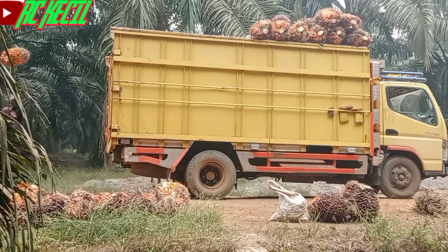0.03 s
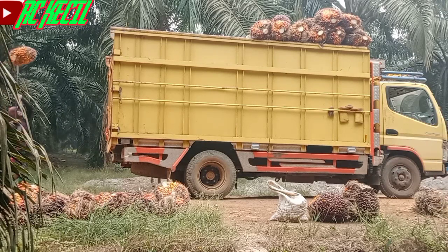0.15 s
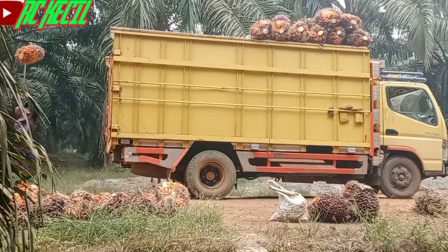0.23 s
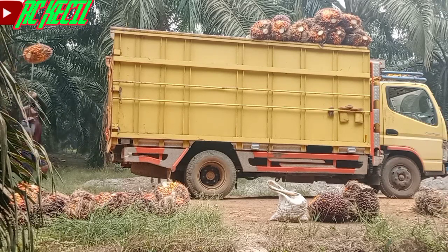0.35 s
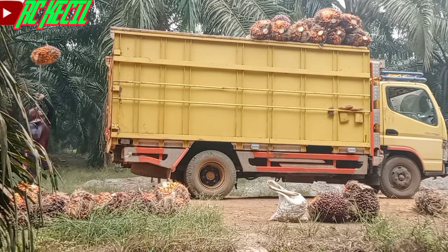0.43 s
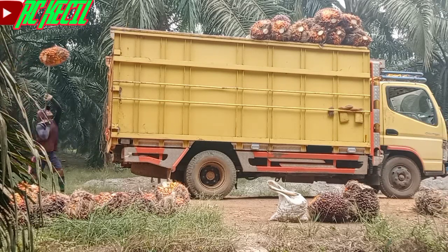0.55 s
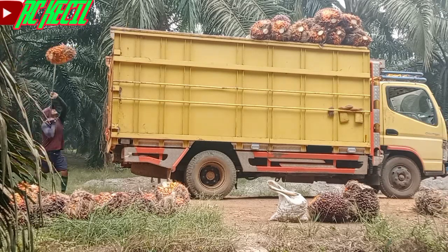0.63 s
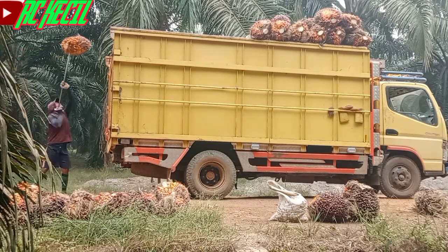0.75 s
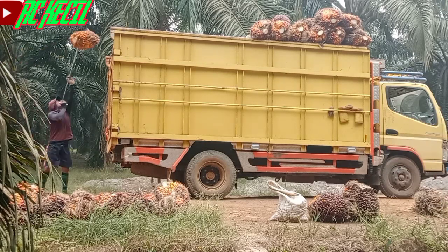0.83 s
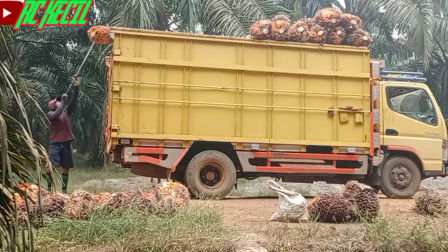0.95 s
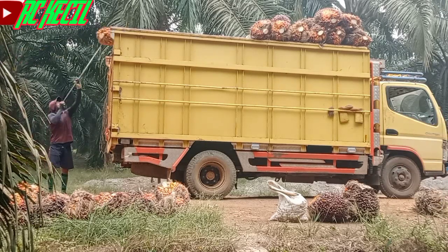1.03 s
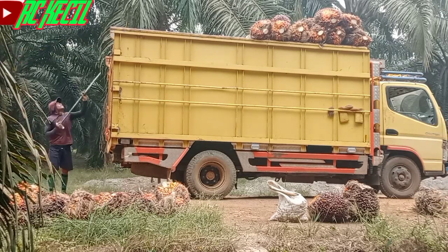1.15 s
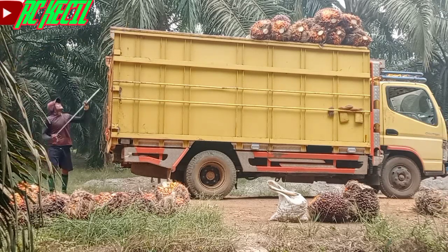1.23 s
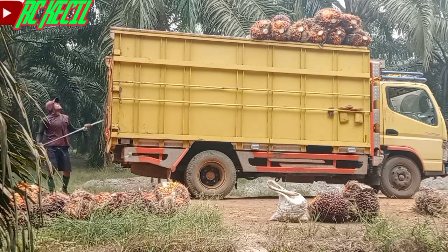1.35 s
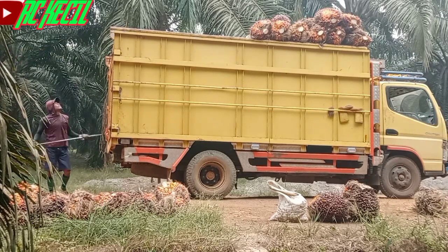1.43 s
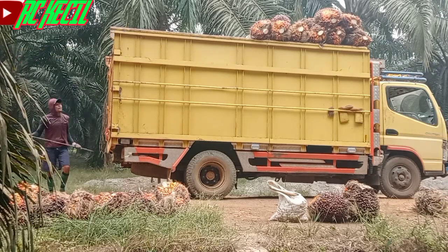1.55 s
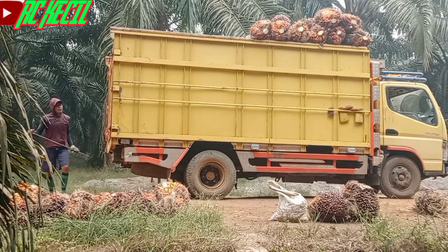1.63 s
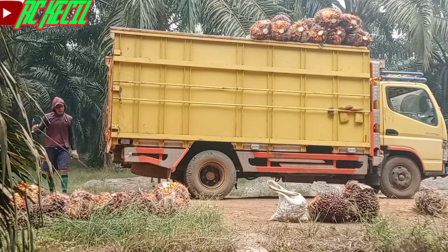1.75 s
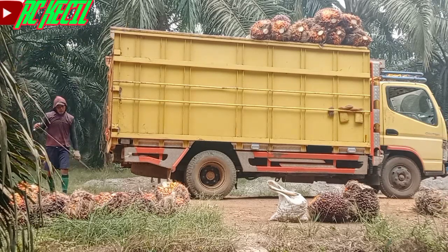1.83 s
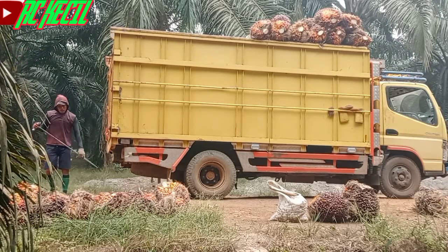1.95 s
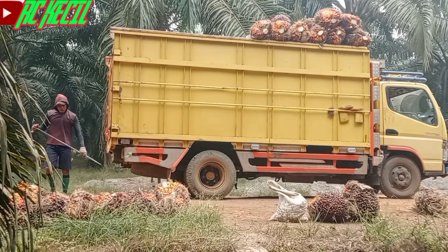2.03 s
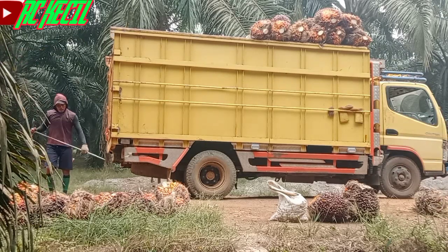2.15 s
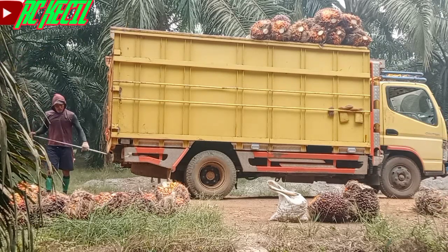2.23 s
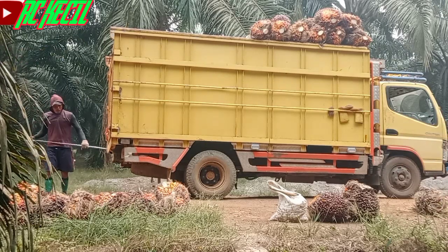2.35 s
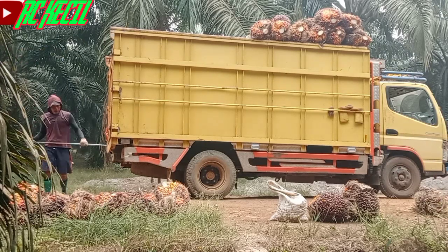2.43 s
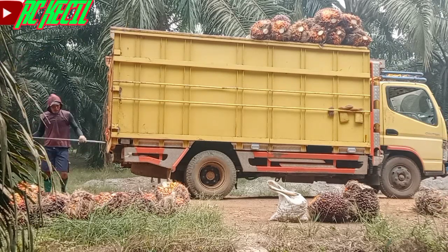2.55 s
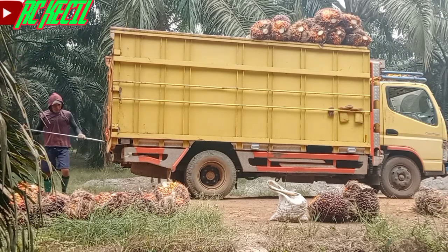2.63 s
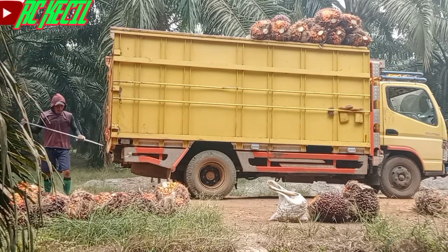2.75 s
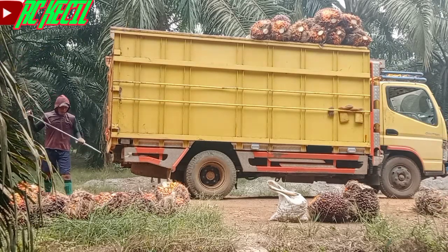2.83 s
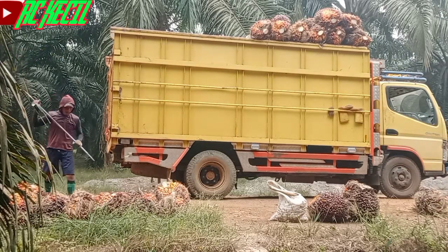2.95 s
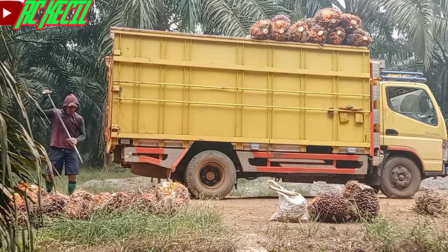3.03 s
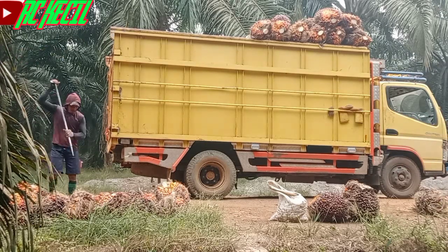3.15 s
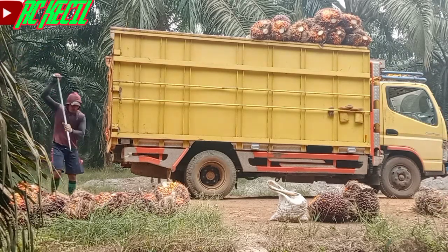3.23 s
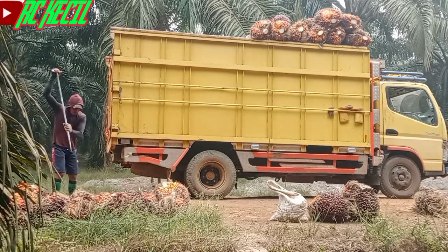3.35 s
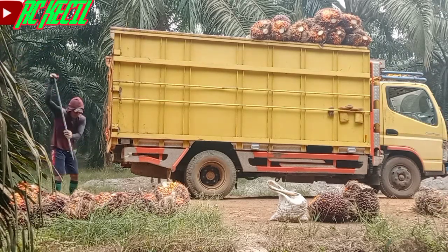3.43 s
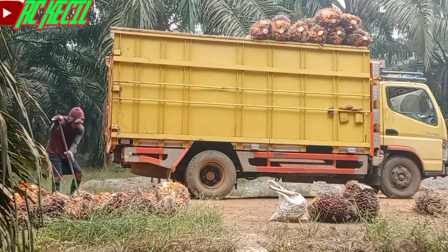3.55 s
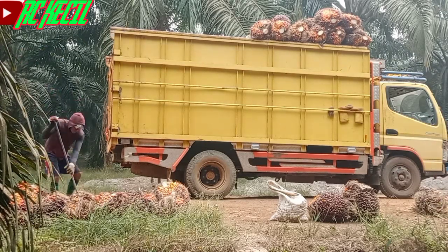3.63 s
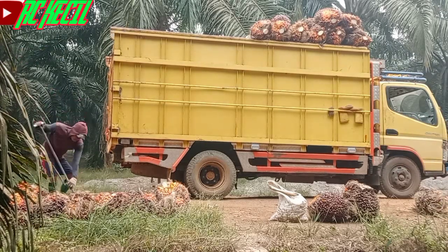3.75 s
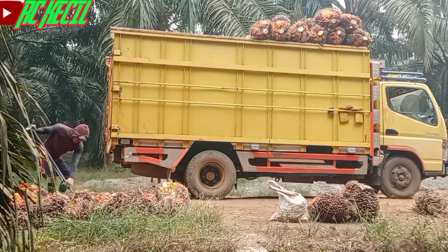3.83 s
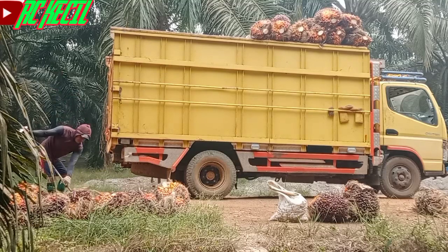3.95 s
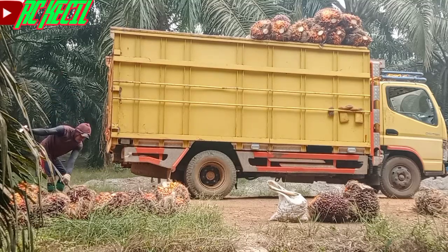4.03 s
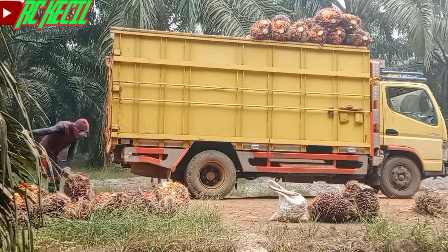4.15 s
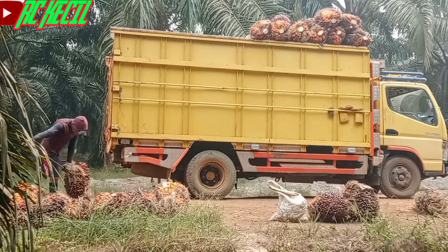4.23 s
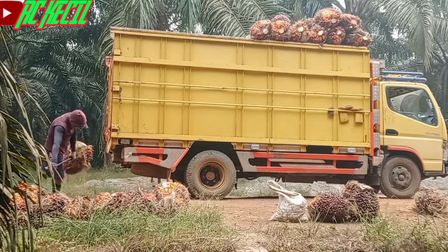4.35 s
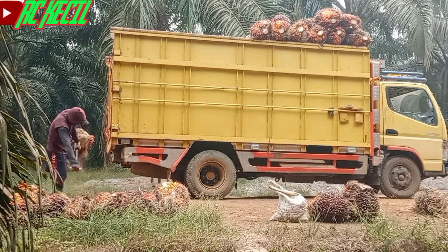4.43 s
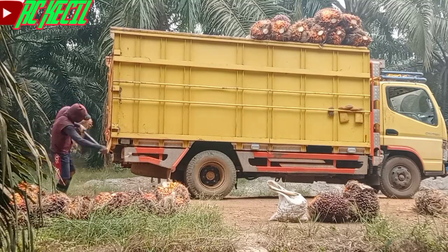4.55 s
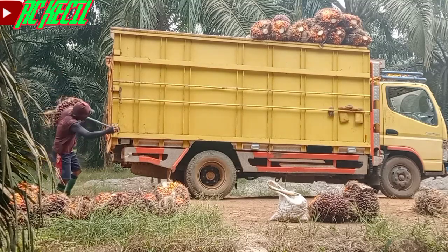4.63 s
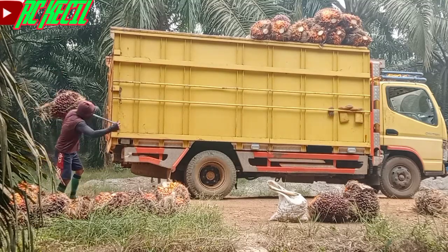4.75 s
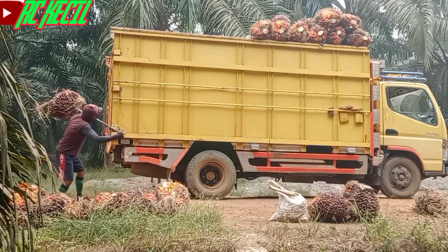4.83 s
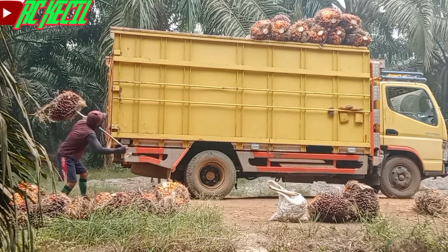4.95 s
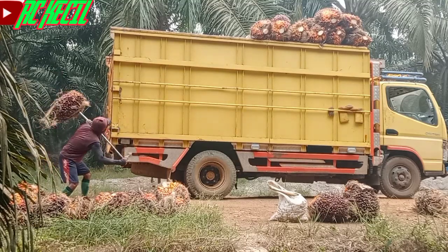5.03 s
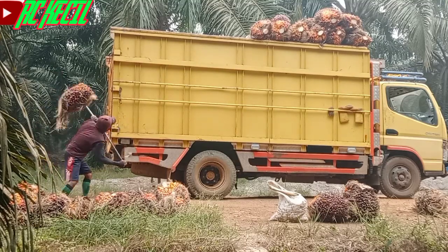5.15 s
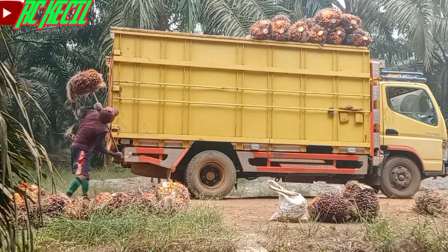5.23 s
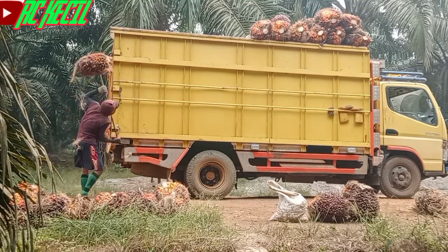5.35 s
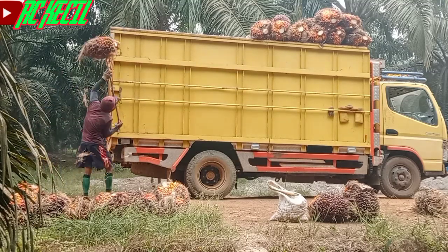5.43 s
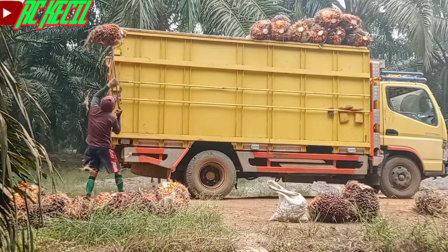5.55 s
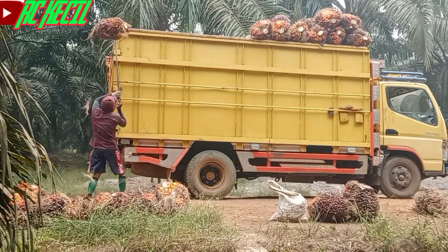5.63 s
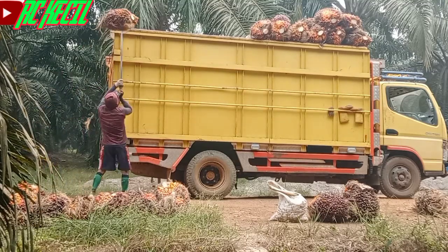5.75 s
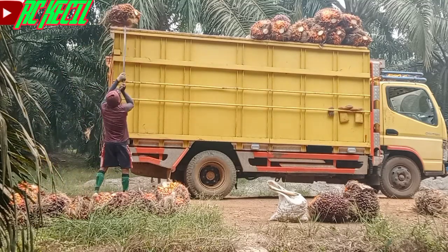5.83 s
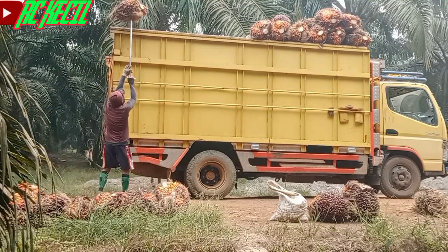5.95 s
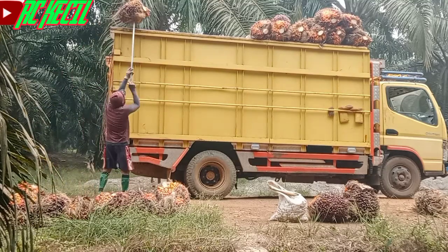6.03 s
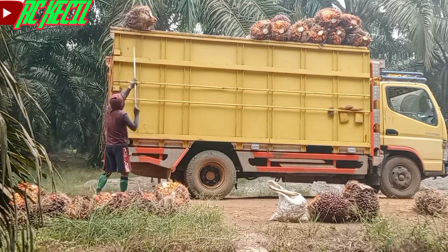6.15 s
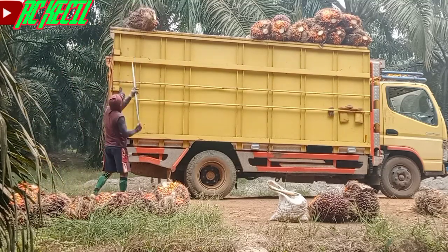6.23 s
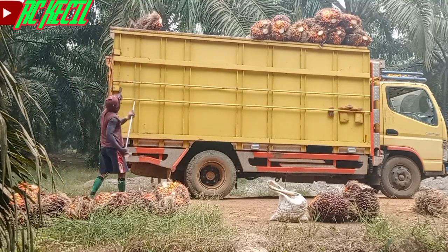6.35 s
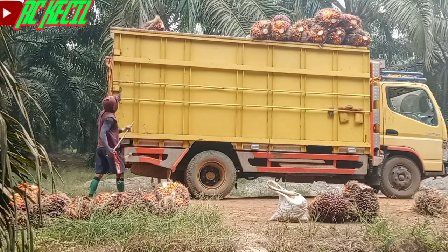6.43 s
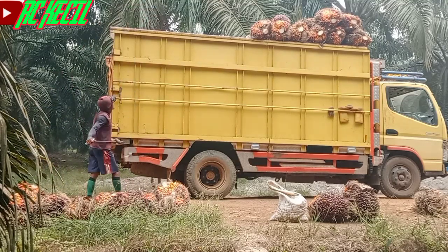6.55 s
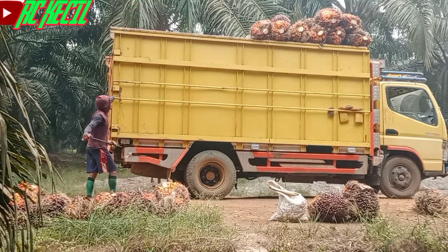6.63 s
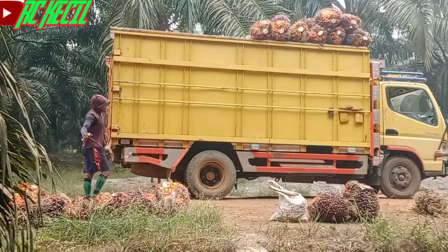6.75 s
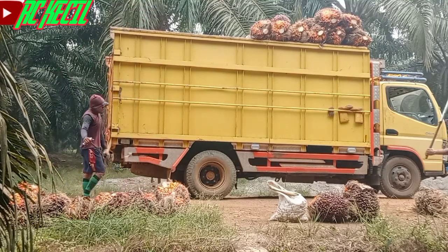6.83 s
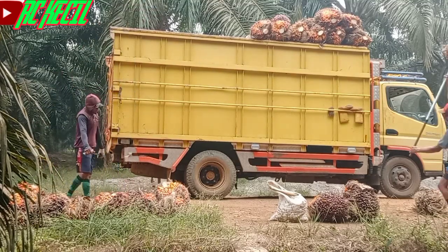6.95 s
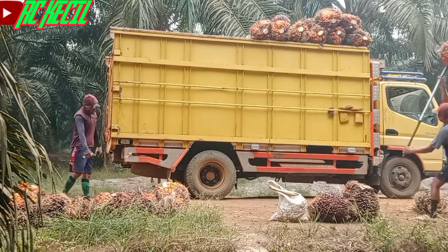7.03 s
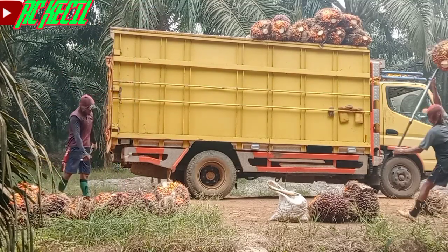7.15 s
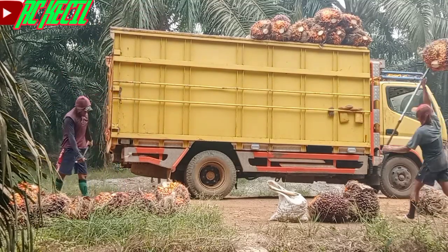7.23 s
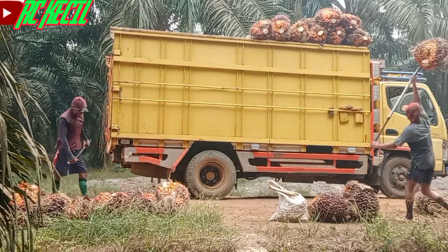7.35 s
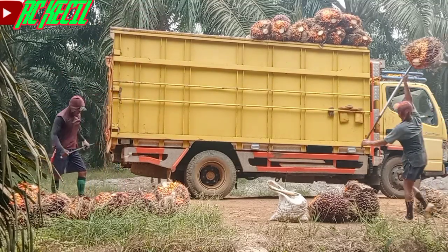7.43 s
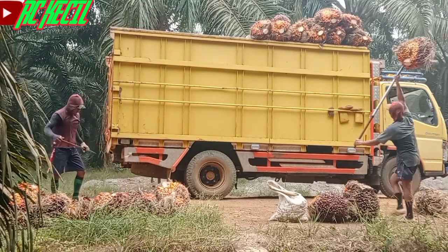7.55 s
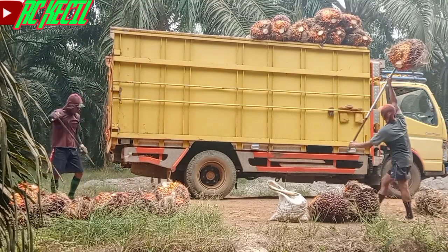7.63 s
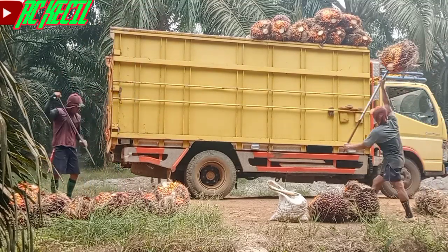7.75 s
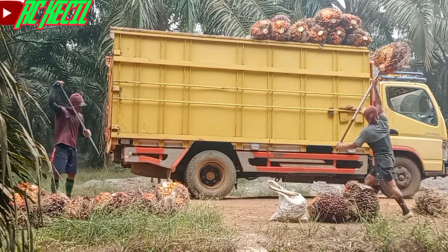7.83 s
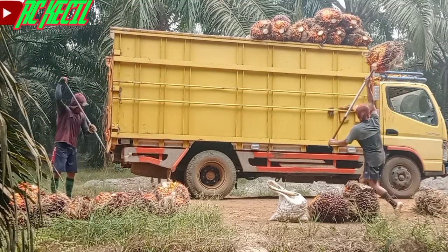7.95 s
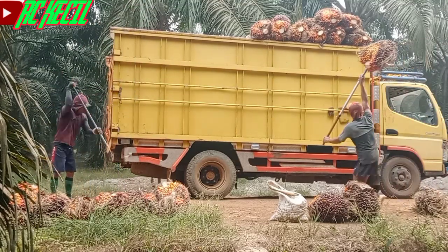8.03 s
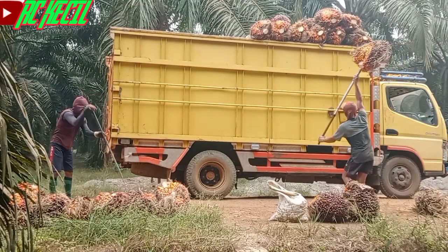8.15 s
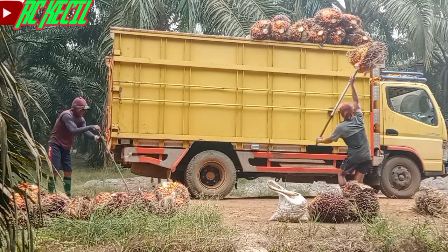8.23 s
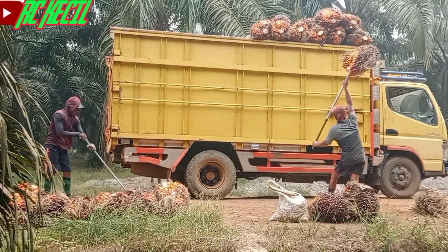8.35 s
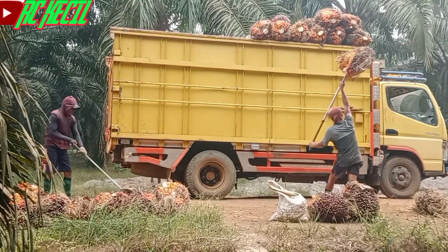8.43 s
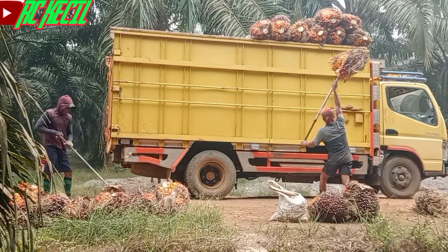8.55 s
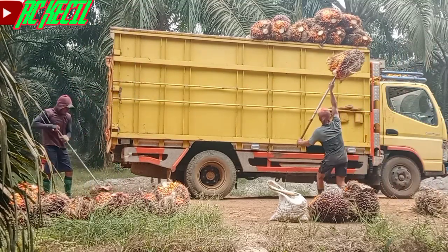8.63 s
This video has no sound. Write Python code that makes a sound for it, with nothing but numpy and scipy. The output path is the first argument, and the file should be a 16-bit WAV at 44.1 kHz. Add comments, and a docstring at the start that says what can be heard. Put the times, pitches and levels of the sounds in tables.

```python
"""Loading palm fruit bunches into a steel truck box

Heavy bunches thud and crunch as decaying tones, box modes and crackling grains; each blow sets the box booming.
A steel pole stabs (torn fibres), clacks (damped modes), scrapes and squeaks (stick-slip); hollow bumps sag in pitch.
Boots, fronds and dry stalks rustle and snap as coloured grains and noise, with dull knocks between.
Behind lie still air, a low rumble and thin insect bands; a close wall echo and a late tail add the place."""
import sys
import numpy as np
from scipy import signal
from scipy.fft import rfft, irfft, next_fast_len
from scipy.io import wavfile
from scipy.ndimage import uniform_filter1d, map_coordinates

SR = 44100
rng = np.random.default_rng(int(sys.argv[2]) if len(sys.argv) > 2 else 0)


def store_pcm(level_fs):
    """Save levels as 16-bit WAV."""
    pcm = np.round(np.clip(level_fs, -1, 1) * 32767).astype(np.int16)
    wavfile.write(sys.argv[1], SR, np.atleast_2d(pcm).T)


N = 383065
T = np.arange(N) / SR  # time axis of the scene, s
HIT = T[:3 * SR // 2]  # time axis of one contact, s

# spectrum of dry spines snapping: freq_hz, level_db
SPINES = [(2940, -42), (5000, -13.5), (5190, -14), (7200, 2.5), (7580, -1), (9560, -17), (12900, -21),
          (14900, -17), (15500, -18)]
# spectrum of scuffed litter and cracking stalks: freq_hz, level_db
SCUFF = [(180, -11), (300, -2.5), (459, -3.5), (775, -2), (1340, -3.5), (2550, -1.5), (3180, 1.5),
         (3860, -1.5), (4930, -15.5), (5500, -16.5), (7150, -48), (12100, -120)]
# spectrum of splintering twigs and stalks: freq_hz, level_db
SPLINTER = [(4000, -9.5), (5200, -10.5), (7300, 5.5), (9500, -10.5), (15000, -16)]


def amp(db):
    """Level law: decibels to amplitude gain."""
    return 10 ** (np.asarray(db) / 20)


def unit(x):
    """Normalisation: scale to rms 1."""
    return x / np.sqrt(np.mean(x ** 2) + 1e-20)


def along(points, hz):
    """Interpolation of (freq_hz, value) points on a logarithmic frequency axis."""
    f, v = np.transpose(points)
    return np.interp(np.log(hz + 1), np.log(np.abs(f) + 1), v)


def wobble(rate):
    """Slow random modulation: a smooth curve through rate random knots a second."""
    return map_coordinates(rng.standard_normal(1024), [T * rate], mode="wrap")


def filtered(x, response):
    """Linear filtering: the spectrum of x times a response of frequency."""
    m = next_fast_len(len(x) + 8192)
    spectrum = rfft(x, m) * response(np.fft.rfftfreq(m, 1 / SR))
    return irfft(spectrum, m)[:len(x)]


def colour(x, spectrum):
    """Spectral shaping: x weighted by a table of levels, at rms 1."""
    return unit(filtered(x, lambda hz: amp(along(spectrum, hz))))


def noise():
    """White noise as long as one contact."""
    return rng.standard_normal(len(HIT))


def grains(size, rate, spread_db):
    """Shot noise: tiny snaps of uneven strength at random moments, rate a second."""
    strength = amp(spread_db * np.clip(rng.standard_normal(size), -2, 2))
    return unit((rng.random(size) < rate / SR) * strength * rng.standard_normal(size))


def lumpy(x, depth_db):
    """Fracture has local pitch: random time-frequency patches stand out of the crackle."""
    z = signal.stft(x, nperseg=256)[2]
    field = uniform_filter1d(rng.standard_normal(z.shape), size=3, axis=0)
    field = uniform_filter1d(field, size=4, axis=1)
    return unit(signal.istft(z * amp(depth_db * unit(field)), nperseg=256)[1][:len(x)])


def swell(rise, t60):
    """Contact law: force builds up over the rise, then decays by 60 dB in t60."""
    build_up = np.sin(np.pi / 2 * np.minimum(HIT / rise, 1)) ** 2
    return build_up * amp(-60 * np.maximum(HIT - rise, 0) / t60)


def held(s, length, attack, t60):
    """Sustained excitation: a movement starts at s, holds until s + length, then decays."""
    build_up = np.sin(np.pi / 2 * np.clip((T - s) / attack, 0, 1)) ** 2
    return build_up * np.exp(-np.log(1000) * np.maximum(T - s - length, 0) / t60)


def dying(x, decays):
    """Frequency-dependent damping: each frequency of x decays with its own t60."""
    hz, t, z = signal.stft(x, SR, nperseg=256)
    loss = amp(-60 * t / along(decays, hz)[:, None])
    return signal.istft(z * loss, SR, nperseg=256)[1][:len(x)]


def ring(modes, rise, vary_db, size):
    """Modal synthesis: damped sines struck at new strengths and phases, starting near rms 1."""
    hz, db, t60 = np.transpose(modes)[:, :, None]
    t = HIT[:size]
    gain = amp(db + vary_db * rng.standard_normal(hz.shape))
    decay = np.exp(-np.log(1000) * np.maximum(t - rise, 0) / t60)
    waves = np.sin(2 * np.pi * (hz * t + rng.random(hz.shape))) * decay
    return (gain * waves).sum(0) / np.sqrt(np.sum(gain ** 2) / 2) * np.minimum(t / rise, 1)


def add(track, s, sound):
    """Superposition: mix a sound into the track at s seconds."""
    part = track[max(round(s * SR), 0):][:len(sound)]
    part += sound[:len(part)]


def landings():
    """Impact on a soft load: the load bounces, the box rings in its modes, fruit and spines fracture."""
    # bunches landing and tumbling: start_s, squash_s, settled_bounce_hz, bounce_db, box_db, rim_db, crunch_db
    impacts = [(1.165, 0.043, 75.4, -30.5, -29, -39.5, -38.5), (1.295, .015, 167.3, -32, -44, -65, -62),
               (1.395, 0.034, 105, -56, -43, -60, -49.5), (1.503, 0.017, 94, -26, -35.5, -36, -35),
               (1.521, 0.016, 196, -28.5, -29.5, -35, -31), (1.689, 0.039, 215, -52, -44.5, -51.5, -55.5),
               (6.147, 0.022, 255, -53.5, -56.5, -66, -60), (6.195, 0.002, 61, -62, -49, -31, -38),
               (6.214, 0.0184, 69, -25.5, -30.5, -34, -39.5), (6.383, .027, 114.7, -39, -47.5, -48, -45),
               (6.752, 0.015, 58, -62, -61, -56.5, -57.5), (6.783, 0.026, 56, -40, -37.5, -49, -61),
               (6.883, .02, 111.5, -48, -60, -71, -78)]
    # strong modes of the steel box: freq_hz, level_db, t60_s
    box_modes = [(53, -1.5, 0.17), (70, 2, 0.22), (94, -2, 1.4), (107.5, 0, 0.91), (118.7, -1.5, 0.62),
                 (152.4, 0, 0.94), (169.8, -9, 1.23), (193.5, 1.5, 0.9), (210, 1.5, 0.37), (230, -4, 0.97),
                 (255.2, -6, 0.85), (308, -16, 0.89), (360, -10, 0.29), (421, -4, 0.39), (443, -21, 0.5),
                 (536.6, -4, 0.36), (639, -6.5, 0.27), (695, -9, 0.22), (813, -4.5, 0.32), (926, -25, 0.93),
                 (1000, -7, 0.19), (1220, -12, 0.4)]
    # spectrum of the thin wall panels: freq_hz, level_db
    panel_spectrum = [(35, -40), (60, 10), (110, 8), (145, -19), (200, 1.5), (280, -4.5), (450, -3),
                      (900, -17), (1400, -26.5), (2500, -15), (5000, -41)]
    # damping of the panels: freq_hz, t60_s
    panel_decay = [(55, 0.25), (110, 0.65), (200, 0.6), (450, 0.38), (1000, 0.64), (3000, 0.2)]
    # spectrum of the knocked rim: freq_hz, level_db
    rim_spectrum = [(300, -12.5), (520, -7.5), (700, -0.5), (860, -6), (965, 5.5), (1050, -9), (1160, -4.5),
                    (1290, -7), (1450, -11), (2200, -10.5), (4000, -39)]
    # spectrum of crushed fruit: freq_hz, level_db
    crunch_spectrum = [(650, -6), (1100, -5.5), (1410, -7), (2030, -9), (2380, -8), (2710, -9),
                       (3280, -2.5), (3760, -8), (4310, -16), (5200, -27), (6760, -44), (11400, -120)]
    out = np.zeros(N)
    for s, rise, hz, bounce_db, box_db, rim_db, crunch_db in impacts:
        # the bounce sinks in pitch while the soft load gives way
        sag = 1 + 0.18 * np.exp(-HIT / 0.017)
        bounce = np.sqrt(2) * np.sin(2 * np.pi * np.cumsum(hz * sag) / SR) * swell(rise, t60=0.26)

        modes = amp(-2.5) * ring(box_modes, rise, vary_db=1.5, size=len(HIT))
        # between the strong modes lie the crowded ones of the thin wall panels
        panels = amp(2.5) * dying(colour(noise(), panel_spectrum), panel_decay) * np.minimum(HIT / rise, 1)
        # the knobbly bunch rocks on the load, so the ringing comes in lumps
        rocking = amp(2 * unit(filtered(noise(), lambda f: np.exp(-(f / 30) ** 2))))
        box = rocking * (modes + panels)
        rim = colour(noise(), rim_spectrum) * swell(rise, t60=0.31)

        # the first crush is followed by loose fruit settling
        crush = swell(rise, t60=0.27) + amp(-15.5) * swell(rise, t60=0.83)
        fruit = lumpy(grains(len(HIT), rate=4400, spread_db=-3), depth_db=4.0)
        crunch = colour(fruit, crunch_spectrum) * crush
        # the spines stick out, so they build up sooner
        snapping = lumpy(grains(len(HIT), rate=7200, spread_db=0), depth_db=-4.0)
        spines = amp(-11.5) * colour(snapping, SPINES) * swell(0.29 * rise, t60=0.55)

        add(out, s, amp(bounce_db) * bounce + amp(box_db) * box)
        add(out, s, amp(rim_db) * rim + amp(crunch_db) * (crunch + spines))
    return out


def stabs():
    """Penetration: the spike tears spines and wet fibres; bunch and stalk knock as damped resonators."""
    # the spike driven into a bunch: start_s, squash_s, tear_db, spine_db, thump_db,
    # bunch_hz, bunch_db, stalk_hz, stalk_db
    thrusts = [(3.633, 0.0062, -37.5, -45.5, -39, 326, -36.5, 650, -41),
               (8.287, 0.008, -40.5, -43.5, -44, 287, -50, 880, -46)]
    # spectrum of tearing fibres: freq_hz, level_db
    tear_spectrum = [(410, -16), (700, 4), (1370, -2), (1850, 2), (2030, -0.5), (2190, 2), (2840, 5),
                     (4030, 1.5), (5150, -20), (6590, -6), (7400, 0), (9350, -8.5), (15500, -18)]
    # spectrum of the dull blow: freq_hz, level_db
    thump_spectrum = [(35, -6), (70, 0), (150, -0.5), (310, 4), (480, 3.5), (700, -12), (1200, -5),
                      (3000, -32)]
    out = np.zeros(N)
    for s, rise, tear_db, spine_db, thump_db, bunch_hz, bunch_db, stalk_hz, stalk_db in thrusts:
        give = swell(rise, t60=0.26) + amp(-16.0) * swell(rise, t60=0.57)
        fibres = lumpy(grains(len(HIT), rate=8000, spread_db=2.5), depth_db=-3.0)
        tear = colour(fibres, tear_spectrum) * give
        spines = colour(grains(len(HIT), rate=5700, spread_db=5), SPINES) * give
        thump = colour(noise(), thump_spectrum) * swell(rise, t60=0.19)
        bunch = np.sqrt(2) * np.sin(2 * np.pi * bunch_hz * HIT) * swell(rise, t60=0.11)
        stalk = np.sqrt(2) * np.sin(2 * np.pi * stalk_hz * HIT) * swell(rise, t60=0.033)
        add(out, s, amp(tear_db) * tear + amp(spine_db) * spines + amp(thump_db) * thump)
        add(out, s, amp(bunch_db) * bunch + amp(stalk_db) * stalk)
    return out


def chatter(count):
    """Repeated contact at geometrically shrinking gaps, ever harder: start_s, level_db, tick_db."""
    start_s, gap_s, shrink = 3.191, 0.0125, 0.85
    level_db, growth_db, tick_db = -25, 1, -4.5
    return [(start_s + gap_s * np.sum(shrink ** np.arange(k)), level_db + k * growth_db, tick_db)
            for k in range(count)]


def clacks():
    """Hard impact: a very short contact excites the modes of the pole; the hands damp it."""
    # single contacts of the pole: start_s, level_db, tick_db (both before the trims below)
    contacts = [(0.7537, -44.5, -25), (0.9817, -46.5, -22), (1.1893, -28, -22), (1.4148, -38.5, -34),
                (1.957, -24, -19), (1.9734, -24, -27), (2.0140, -24, -4), (2.0195, -20.5, -22),
                (2.0494, -25.5, -6), (2.0663, -32, -0.5), (2.1822, -31, -3.5), (2.7786, -36.5, -3),
                (3.0769, -42.5, -16), (3.1724, -39, -5), (3.3032, -34, -1), (6.401, -31.5, -24)]
    # modes of the steel pole: freq_hz, level_db, t60_s
    pole_modes = [(1430, -28, .03), (1830, -9, .035), (2400, 0, 0.024), (2500, 1, .03), (3020, -2.5, .04),
                  (3420, -8, 0.084), (3560, 13.5, 0.057), (3740, -7, 0.058), (4030, -19, .035)]
    # spectrum of the crack: freq_hz, level_db
    crack_spectrum = [(300, -38), (900, -10), (1800, -0.5), (3000, -5.5), (3700, 4.5), (4400, -16.5),
                      (6000, -30.5)]
    # spectrum of the bright tick: freq_hz, level_db
    tick_spectrum = [(4000, -23), (5200, -7), (6700, 7.5), (7600, -1), (9000, -11), (15000, -24)]
    out, size = np.zeros(N), SR // 4
    for s, db, tick_db in contacts + chatter(count=6):
        steel = amp(-8) * ring(pole_modes, rise=0.00019, vary_db=7.5, size=size)
        crack = amp(-2.5) * colour(rng.standard_normal(size), crack_spectrum) * swell(0.00075, t60=0.02)[:size]
        tick = colour(rng.standard_normal(size), tick_spectrum) * swell(0.00027, t60=0.04)[:size]
        tick *= amp(tick_db - 8.5)
        # the pole keeps moving, so every contact scatters differently off the truck
        scatter = amp(-17) * colour(rng.standard_normal(size), crack_spectrum) * swell(0.015, t60=0.17)[:size]
        add(out, s, amp(db - 5.5) * (steel + crack + tick + scatter))
    return out


def drag():
    """Stick-slip friction: grains of slip excite low resonances under a grainy rasp."""
    # strokes of the sliding pole: start_s, length_s, groan_db, rasp_db
    strokes = [(1.867, 0.066, -43.5, -52), (1.932, 0.18, -53, -49.5), (2.161, 0.027, -59, -61.5),
               (2.313, 0.066, -57.5, -52), (2.599, 0.034, -60, -58.5)]
    # groaning resonances: freq_hz, width_hz, level_db
    groan_modes = [(262, 38, -4.5), (493, 10.7, 3), (551, 20, -6.5), (637, 26, -5), (717, 15, -5),
                   (831, 22, -2.5), (922, 26, -4.5), (946, 77, -9)]
    # spectrum of the rasp: freq_hz, level_db
    rasp_spectrum = [(590, -28), (1000, -1.5), (1500, -6), (2600, -2.5), (3050, -0.5), (3450, 2),
                     (3800, -4), (5100, -19.5), (7100, -6.5), (9000, -17), (12500, -24.5), (15500, -25)]

    def body(f):
        """Sum of second-order resonances with alternating sign."""
        return sum((-1) ** k * amp(db) * 1j * f * width / (hz * hz - f * f + 1j * f * width)
                   for k, (hz, width, db) in enumerate(groan_modes))

    groan = unit(filtered(grains(N, rate=620, spread_db=0.5), body))
    rasp = colour(lumpy(grains(N, rate=8400, spread_db=-1.5), depth_db=3.5), rasp_spectrum)
    out = np.zeros(N)
    for s, length, groan_db, rasp_db in strokes:
        stroke = held(s, length, attack=0.022, t60=0.31)
        out += stroke * (amp(groan_db) * groan + amp(rasp_db) * rasp)
    return out


def squeaks():
    """Fast stick-slip: a frequency-jittered tone with a weak octave makes a rough whistle."""
    # the pole squeaking as it slides: start_s, length_s, pitch_hz, level_db
    whistles = [(0.0, 0.059, 3350, -67), (0.752, 0.011, 3790, -55.5), (0.778, .06, 3280, -65),
                (1.343, 0.046, 3314, -56), (1.935, 0.072, 3504, -43.5), (2.16, 0.039, 3470, -48.5),
                (2.322, 0.075, 3305, -49.5), (2.479, 0.053, 3410, -63.5), (2.59, .05, 3010, -63.5),
                (3.178, 0.048, 3200, -45.5), (6.794, 0.045, 3130, -55), (7.145, 0.11, 2970, -70)]
    out = np.zeros(N)
    for s, length, hz, db in whistles:
        jitter = unit(filtered(noise(), lambda f: np.exp(-(f / 250) ** 2)))
        phase = 2 * np.pi * np.cumsum(hz * (1 + 0.0404 * jitter)) / SR
        stroke = np.sqrt(np.abs(np.sin(np.pi * np.minimum(HIT / length, 1))))
        tone = np.sin(phase) + amp(-19.5) * np.sin(2 * phase)
        add(out, s, amp(db) * np.sqrt(2) * stroke * tone)
    return out


def bumps():
    """Hollow resonance: a damped tone with a weak octave sags in pitch as it dies."""
    # hollow bumps, perhaps of the pole against the truck: start_s, reference_hz, level_db
    hollow_notes = [(4.405, 255, -56), (5.445, 320, -41.5), (7.688, 246, -57.5)]
    out = np.zeros(N)
    for s, hz, db in hollow_notes:
        # from 1.092 down to 0.642 of the reference
        sag = 0.642 + 0.45 * np.exp(-HIT / 0.0192)
        phase = 2 * np.pi * np.cumsum(hz * sag) / SR
        tone = np.sin(phase) + amp(-20.5) * np.sin(2 * phase)
        add(out, s, amp(db) * np.sqrt(2) * tone * swell(0.012, t60=0.11))
    return out


def rustle():
    """Granular friction: boots, a carried bunch and stirring fronds add in power as scuff and crackle."""
    # boots pushing through the litter: start_s, rise_s, scuff_db, fibre_db
    steps = [(0.04, 0.056, -70, -93), (0.55, .06, -64, -66.5), (0.76, .05, -65.5, -80),
             (0.9, 0.035, -62, -71), (2.768, 0.013, -65.5, -77), (3.22, 0.036, -54.5, -58.5),
             (3.295, 0.018, -56, -67), (3.44, 0.053, -63.5, -66.5), (4.039, 0.031, -58, -61.5),
             (4.17, 0.015, -57, -65), (4.6, 0.1, -67.5, -72), (5.26, 0.042, -66.5, -65.5),
             (5.47, 0.048, -57.5, -65.5), (5.61, 0.067, -49, -54), (5.916, 0.0069, -57, -66),
             (6.66, 0.012, -70, -75), (6.779, 0.032, -53, -55.5), (6.87, 0.018, -77, -59.5),
             (7.25, 0.039, -67, -68.5), (7.88, 0.045, -82, -83), (7.98, 0.028, -77, -77),
             (8.38, 0.026, -64, -58.5)]
    # spectrum of dry fibres: freq_hz, level_db
    fibre_spectrum = [(2940, -26), (5000, -24), (5500, -13), (7200, 3), (9040, -11.5), (12200, -14.5),
                      (14900, -17), (15500, -10)]
    moves = [(held(s, rise, rise, t60=0.73), scuff_db, fibre_db) for s, rise, scuff_db, fibre_db in steps]

    # the speared bunch rustles while it is hoisted, less as it settles on the spike
    carry_start_s, settle_db_per_s = 3.7, 5
    carry = held(carry_start_s, length=2.62, attack=0.043, t60=0.5) * amp(-settle_db_per_s * (T - carry_start_s))
    moves.append((carry, -63.5, -64.5))
    # fronds stir all the while
    moves.append((amp(6 * wobble(5.1)), -82, -86))

    # separate movements add in power
    scuff = np.sqrt(sum((amp(db) * shape) ** 2 for shape, db, _ in moves))
    fibre = np.sqrt(sum((amp(db) * shape) ** 2 for shape, _, db in moves))
    low = scuff * colour(lumpy(grains(N, rate=7000, spread_db=1), depth_db=1.5), SCUFF)
    high = fibre * colour(lumpy(grains(N, rate=8000, spread_db=-0.5), depth_db=1.5), fibre_spectrum)
    clumps = unit(amp(0.74 * wobble(45)))
    # sparse stray twigs tick, relative to the crackle of the fibres
    twigs = amp(-13.5) * fibre * colour(grains(N, rate=14, spread_db=1.5), SPLINTER)
    return clumps * (low + high) + twigs


def snaps():
    """Brittle fracture: dry stalks and spines give way with a short crack and a bright splintering."""
    # snaps: start_s, level_db (before the trim below), tick_db (relative to the crack)
    fractures = [(0.094, -44, -30), (0.602, -50, -6), (3.963, -42.5, -3.5), (4.087, -44, -16),
                 (4.184, -42, -18), (5.926, -40, -11), (6.199, -31.5, 7), (6.383, -37.5, 0),
                 (6.676, -51.5, -9), (6.955, -51.5, 5.5), (8.067, -54, -18)]
    out = np.zeros(N)
    for s, db, tick_db in fractures:
        crack = colour(noise(), SCUFF) * swell(0.00087, t60=0.048)
        tick = amp(tick_db) * colour(noise(), SPLINTER) * swell(0.0004, t60=0.061)
        add(out, s, amp(db - 11) * (crack + tick))
    return out


def knocks():
    """Damped impact: soft contacts give enveloped noise with no ring."""
    # dull knocks of tools and boots against bunches: start_s, level_db
    dull_contacts = [(2.775, -58.5), (5.233, -59.5), (5.52, -59), (7.275, -61), (7.368, -61), (7.905, -65),
                     (8.06, -66), (8.425, -57.5)]
    # spectrum of a dull knock: freq_hz, level_db
    knock_spectrum = [(150, -15), (350, -4), (800, -1), (1700, -3.5), (2600, -13), (4500, -24), (8000, -40)]
    out = np.zeros(N)
    for s, db in dull_contacts:
        add(out, s, amp(db) * colour(noise(), knock_spectrum) * swell(0.0066, t60=0.19))
    return out


def truck_side(x):
    """Early reflection: the ribbed wall of the box throws back a close, scattered echo."""
    t = T[:SR // 8]
    echo = rng.standard_normal(len(t)) * amp(-60 * t / 0.08) * np.minimum(t / 0.0039, 1)
    return signal.fftconvolve(x, echo / np.linalg.norm(echo))[:N]


def grove(x):
    """Diffuse reverberation: trunks and fronds scatter a thin, late tail."""
    # damping of the tail: freq_hz, t60_s
    tail_decay = [(60, 0.56), (150, 0.71), (1000, 0.57), (3500, 0.5), (12000, 0.41)]
    tail = dying(rng.standard_normal(SR), tail_decay) * np.minimum(T[:SR] / 0.015, 1)
    return signal.fftconvolve(x, tail / np.linalg.norm(tail))[:N]


def insects():
    """Amplitude modulation: noise times a swaying carrier makes thin bands, louder as they rise."""
    # bands: start_s, end_s, centre_hz, width_hz, level_db, pitch_swing_hz
    bands = [(0, 8.69, 11230, 330, -83, 250.4), (0, 0.56, 9820, 200, -84.5, 30),
             (7.3, 8.69, 9700, 214, -88, 30)]
    cycle_s, swell_db = 0.667, 2.5
    out = np.zeros(N)
    for start, end, hz, width_hz, db, swing_hz in bands:
        effort = np.tanh(2 * np.cos(2 * np.pi * T / cycle_s) + 0.5 * wobble(4))
        buzz = unit(filtered(rng.standard_normal(N), lambda f: np.exp(-(f / width_hz) ** 2)))
        gate = np.clip(np.minimum(T - start, end - T) / 0.05 + 1, 0, 1)
        # more effort is higher and louder
        carrier = np.sin(2 * np.pi * np.cumsum(hz + swing_hz * effort) / SR)
        out += gate * amp(db) * buzz * amp(swell_db * effort) * carrier
    return out


def plantation():
    """Stationary and slowly modulated noise: still air, faint hiss, a restless rumble, and insects."""
    # spectrum of the air: freq_hz, level_db
    air_spectrum = [(15, -39), (25, -38), (64, 6), (124, -3), (188, 1), (332, -7.5), (517, -7), (1690, -12),
                    (3360, -14), (3710, -16.5), (4980, -35), (7040, -26.5), (9000, -51), (11700, -63),
                    (19800, -120)]
    # low rumble around the truck: time_s, level_db (before the trim and wobble below)
    rumble_levels = [(0, -68.5), (1.1, -72), (2.6, -63.5), (2.9, -61), (3.5, -60), (4.8, -69), (5.7, -61.5),
                     (7.15, -60.5), (7.6, -68.5), (8.25, -74.5), (8.5, -59.5), (8.69, -66.5)]
    # spectrum of the rumble: freq_hz, level_db
    rumble_spectrum = [(35, -31), (62, 0.5), (110, -2.5), (160, -4), (205, 2), (260, -8), (360, -14.5),
                       (700, -38)]
    air = amp(-68.5) * colour(rng.standard_normal(N), air_spectrum)
    hiss = amp(-85.0) * colour(rng.standard_normal(N), [(5000, -40), (9000, 12), (15000, 6.5)])
    rumble_db = np.interp(T, *np.transpose(rumble_levels)) + 2.3 * wobble(6.4) - 1.5
    rumble = amp(rumble_db) * colour(rng.standard_normal(N), rumble_spectrum)
    return air + hiss + rumble + insects()


def scene():
    """Superposition of the work, its echoes and the surroundings, in one channel."""
    heavy = landings()
    pole = stabs() + drag() + squeaks() + bumps()
    echoes = amp(-11.0) * truck_side(pole) + grove(amp(-12.5) * heavy + amp(-15.5) * pole)
    return (heavy + pole + clacks() + echoes + rustle() + snaps() + knocks() + plantation())[None]


def record(dry):
    """Band limitation: the recorder keeps nothing above its upper limit."""
    top_hz = 15750
    return np.array([filtered(channel, lambda hz: hz < top_hz) for channel in dry])


dry = scene()
out = record(dry)
store_pcm(out)
```